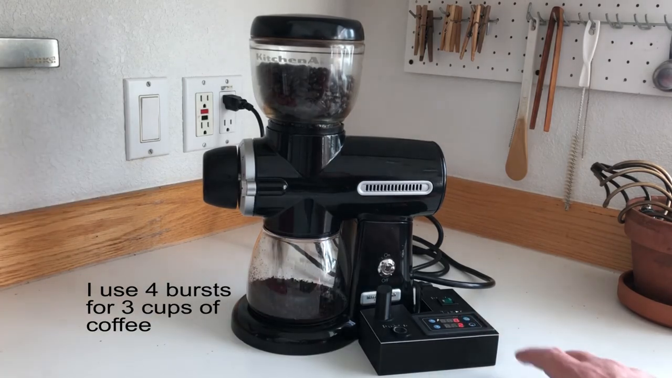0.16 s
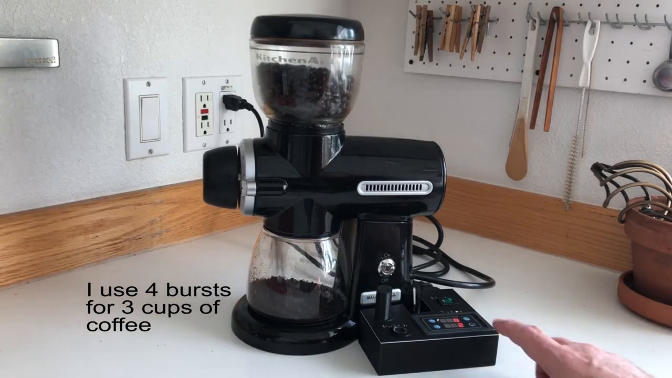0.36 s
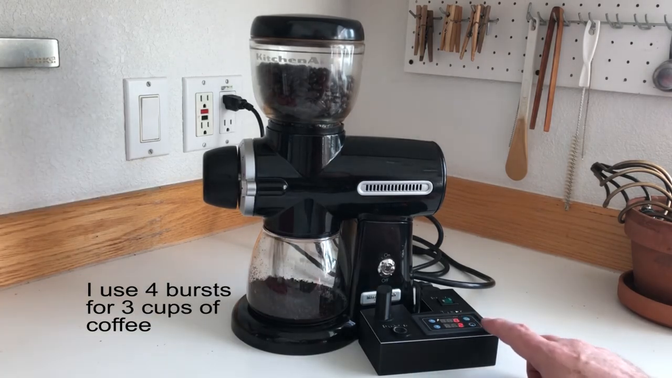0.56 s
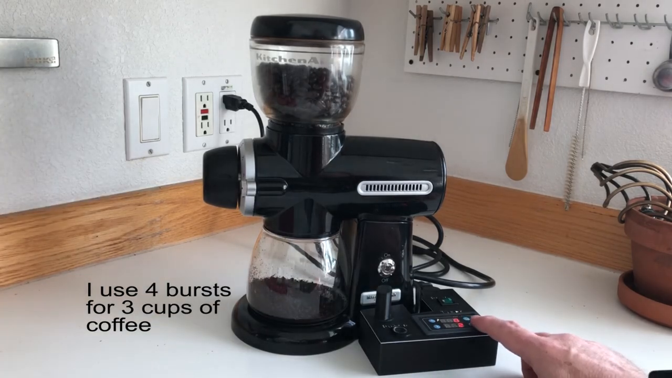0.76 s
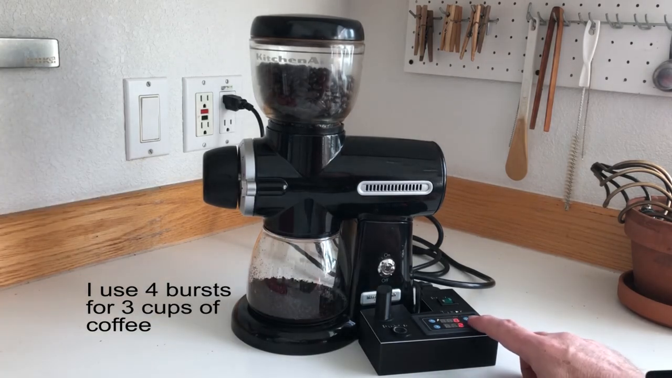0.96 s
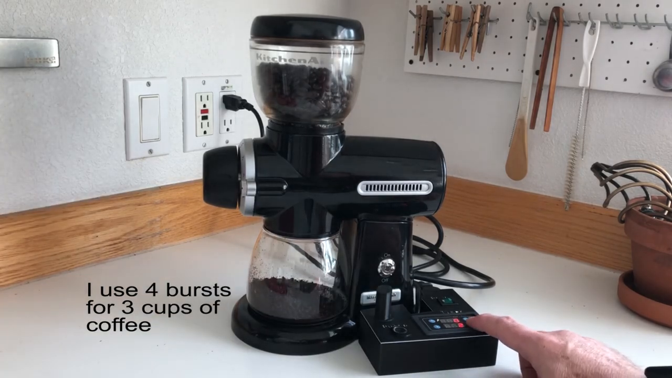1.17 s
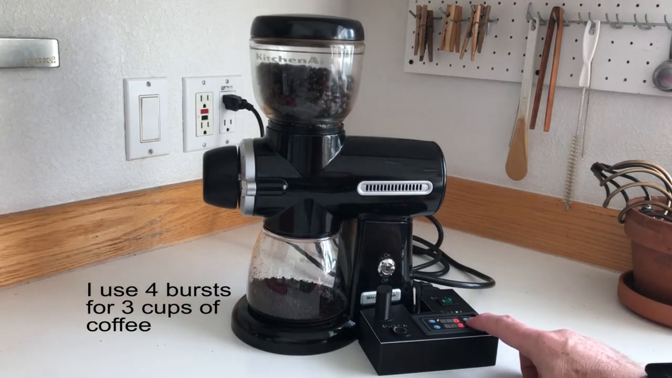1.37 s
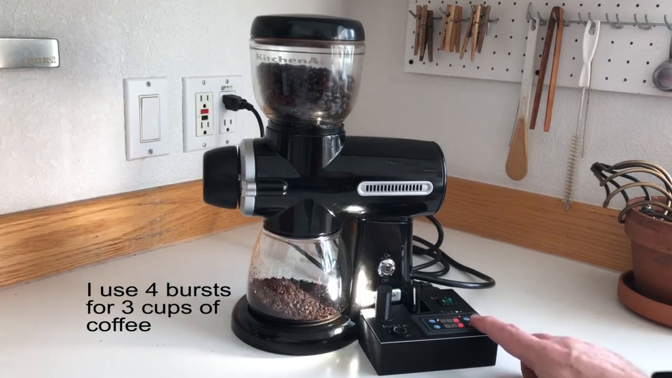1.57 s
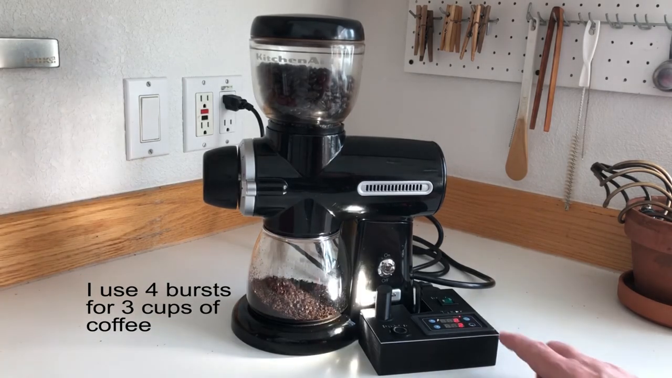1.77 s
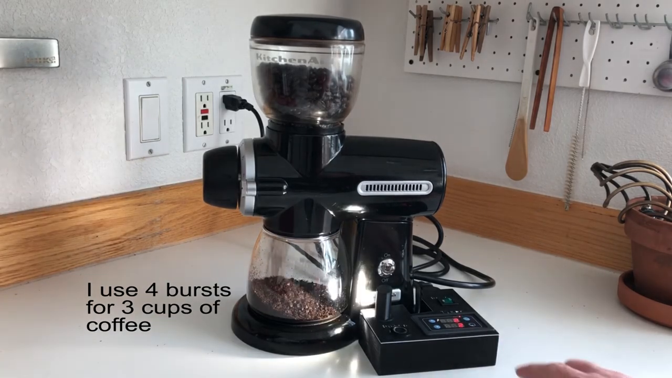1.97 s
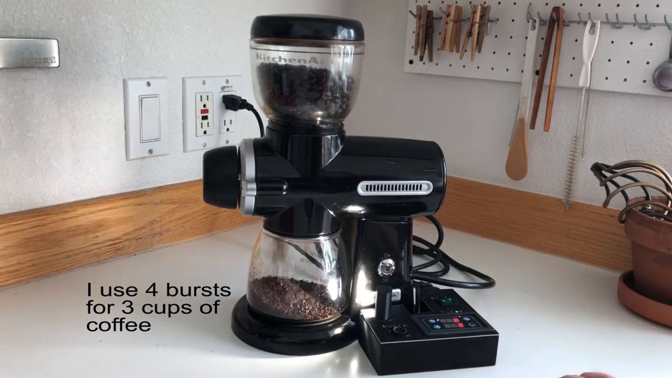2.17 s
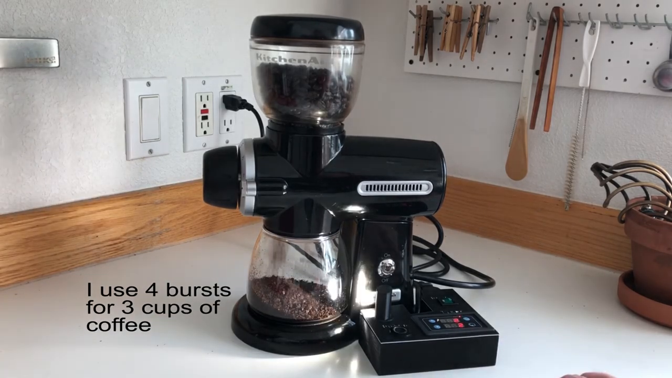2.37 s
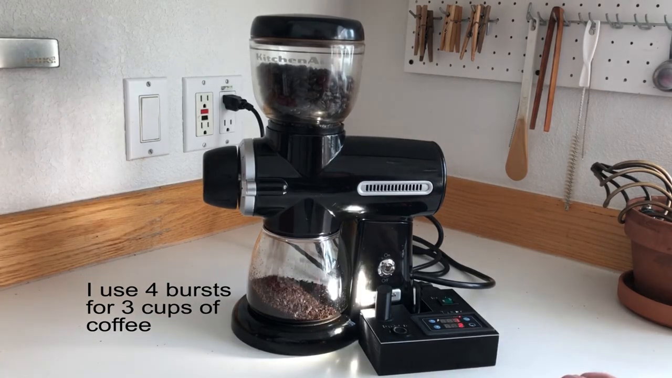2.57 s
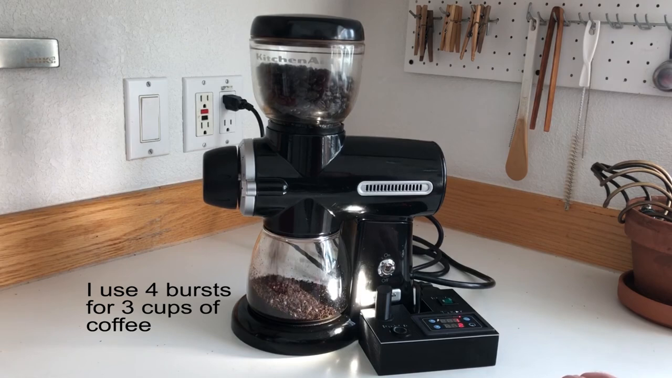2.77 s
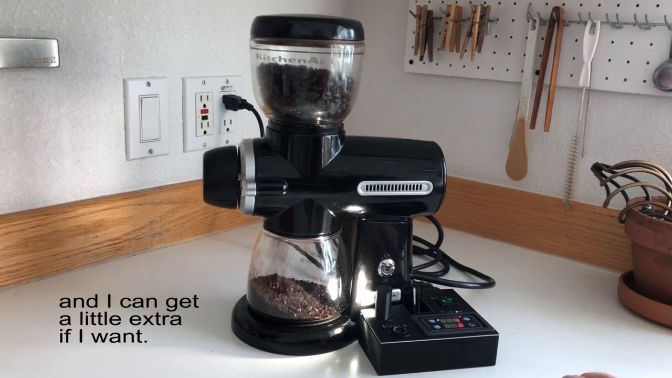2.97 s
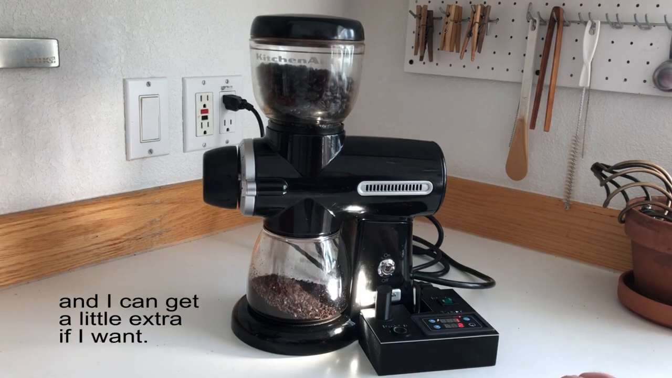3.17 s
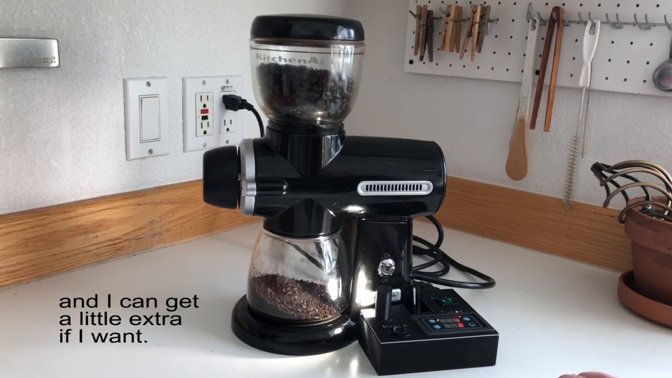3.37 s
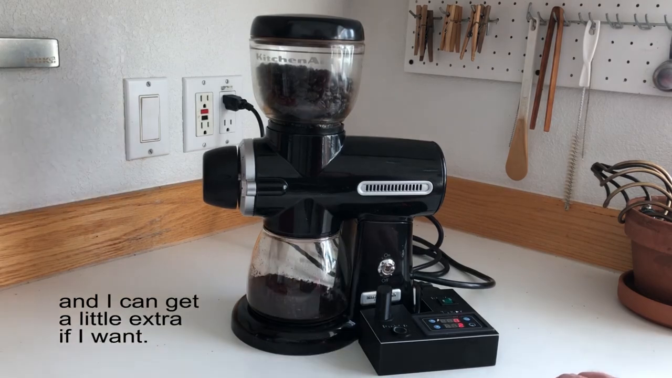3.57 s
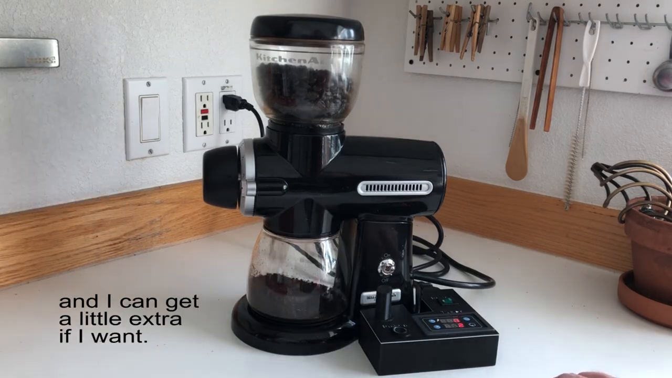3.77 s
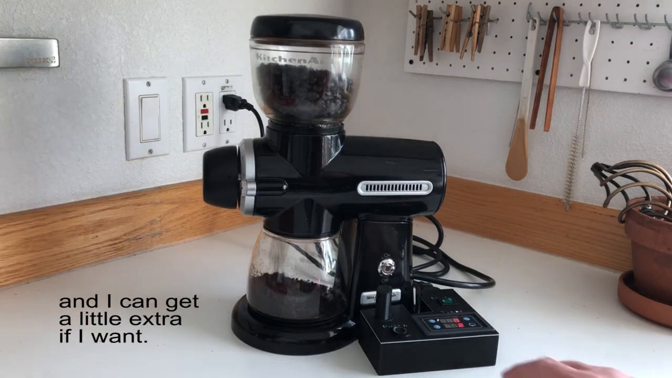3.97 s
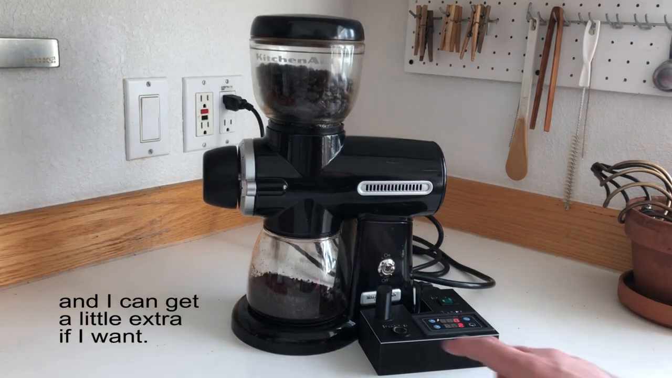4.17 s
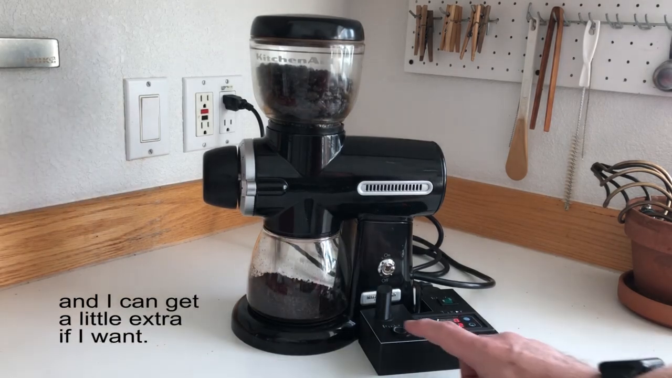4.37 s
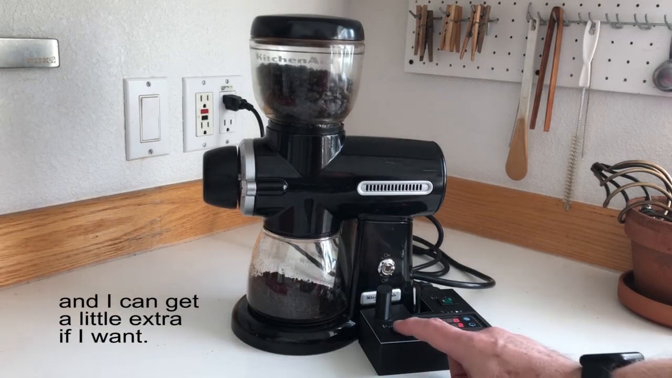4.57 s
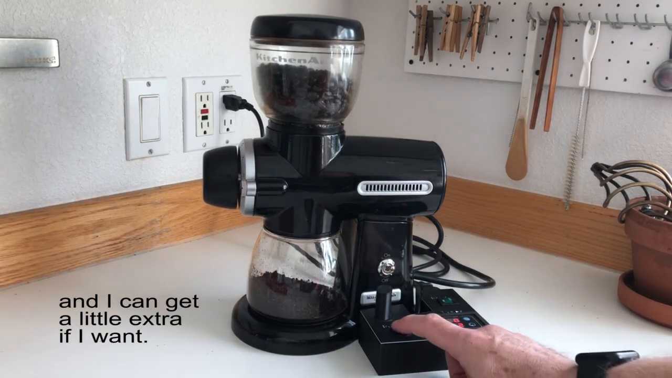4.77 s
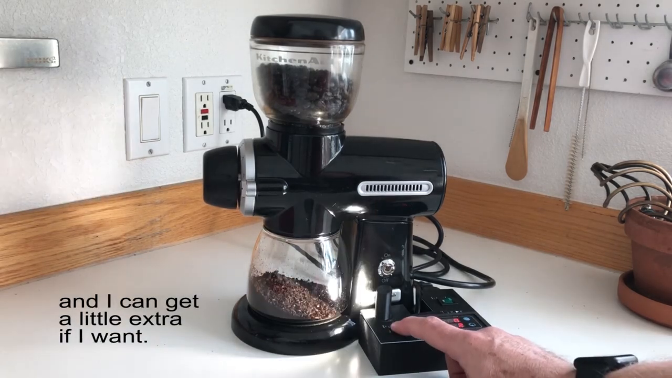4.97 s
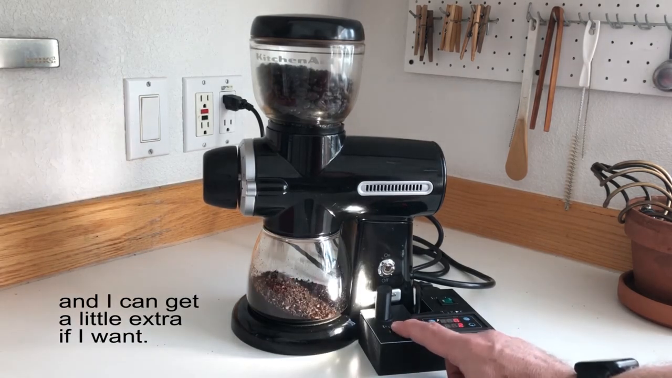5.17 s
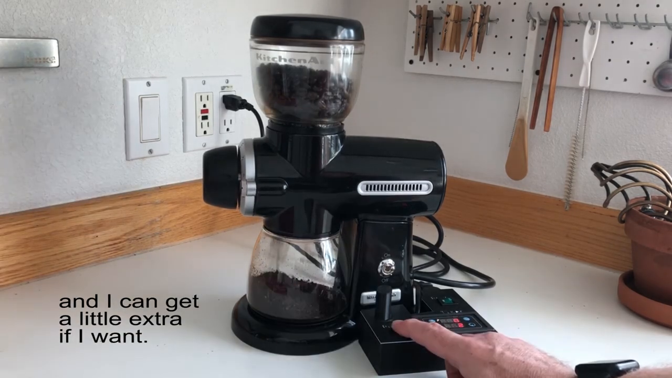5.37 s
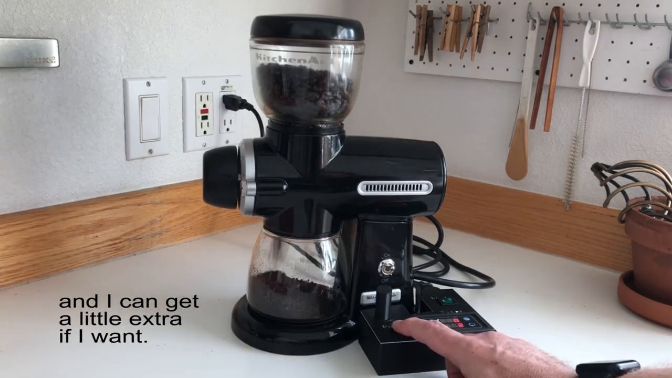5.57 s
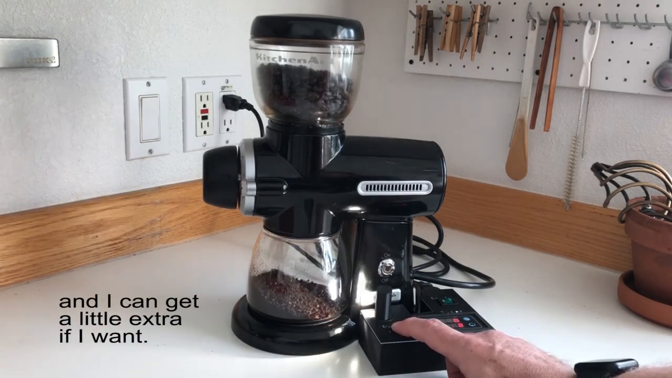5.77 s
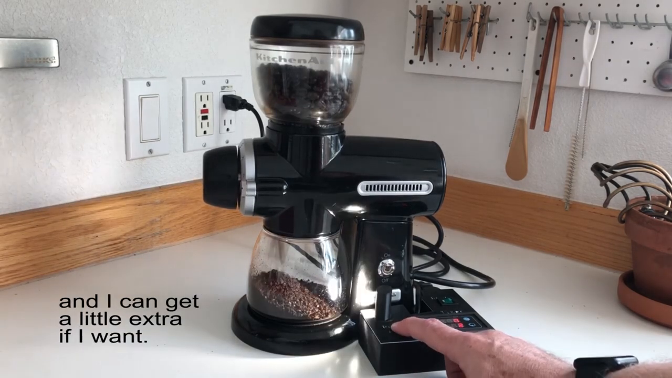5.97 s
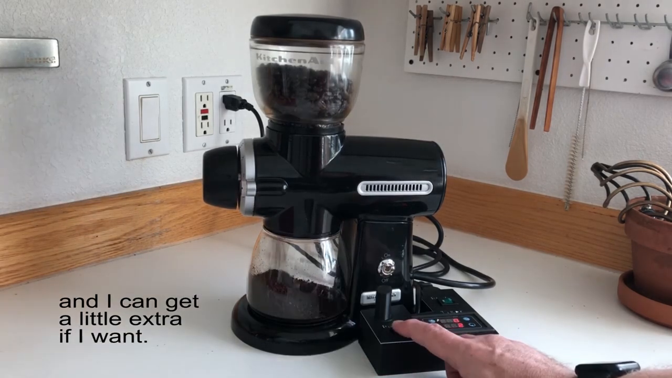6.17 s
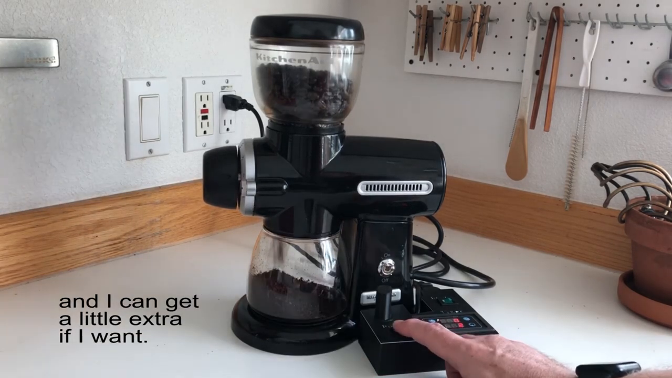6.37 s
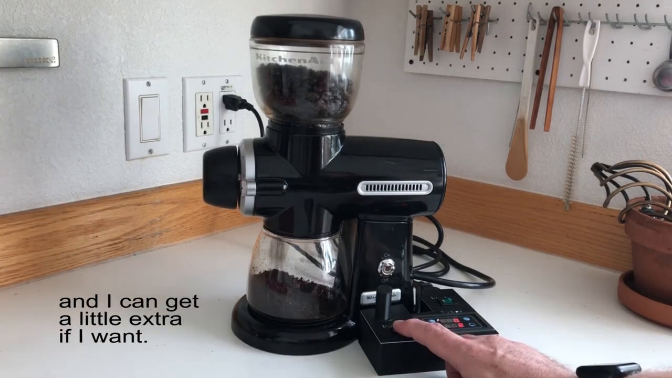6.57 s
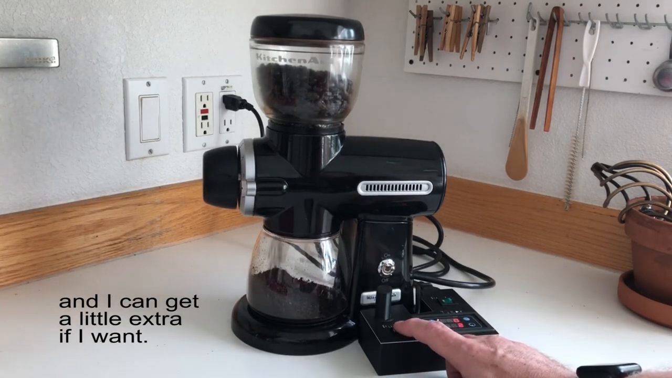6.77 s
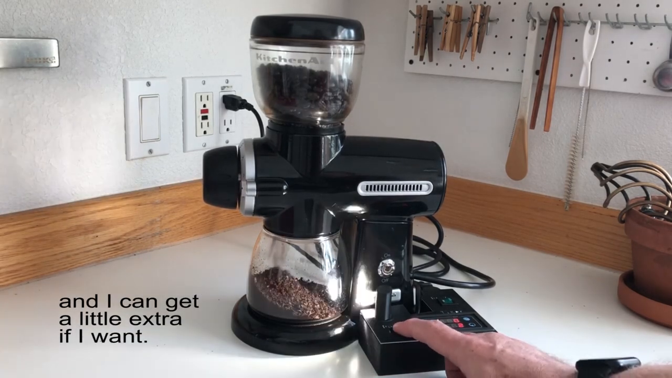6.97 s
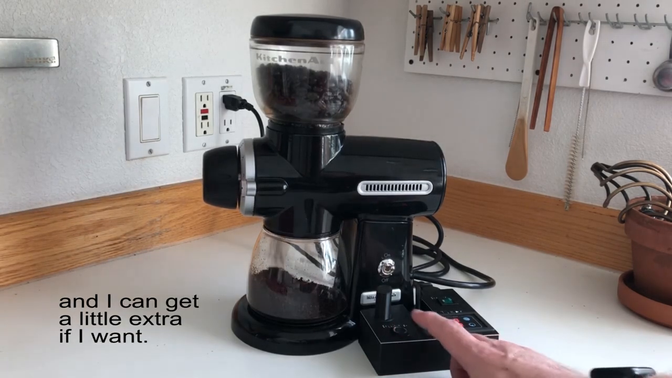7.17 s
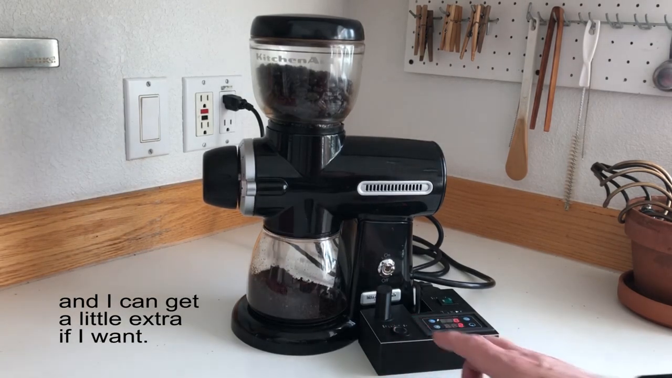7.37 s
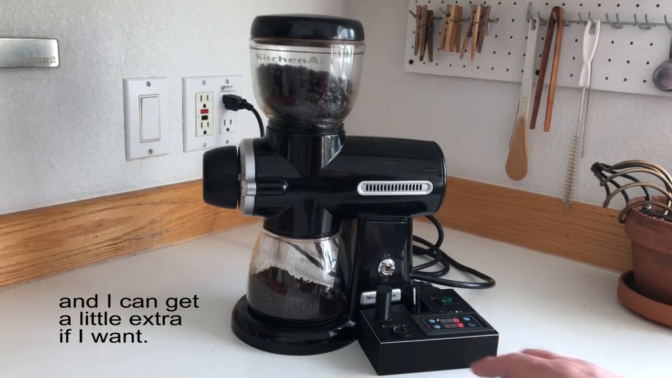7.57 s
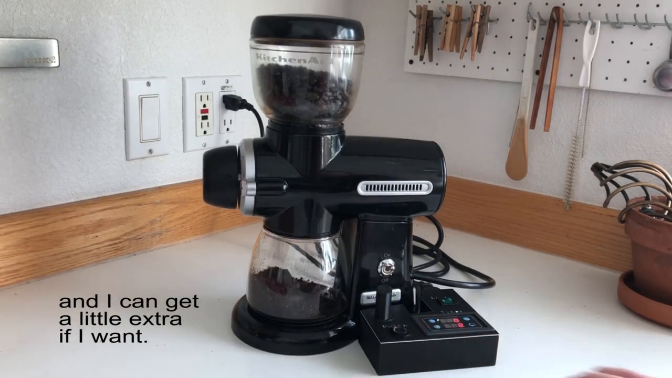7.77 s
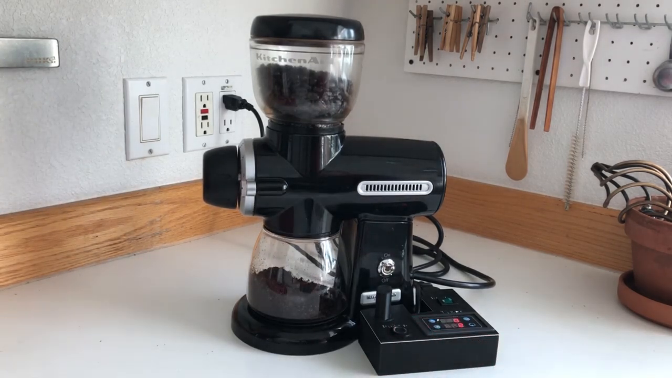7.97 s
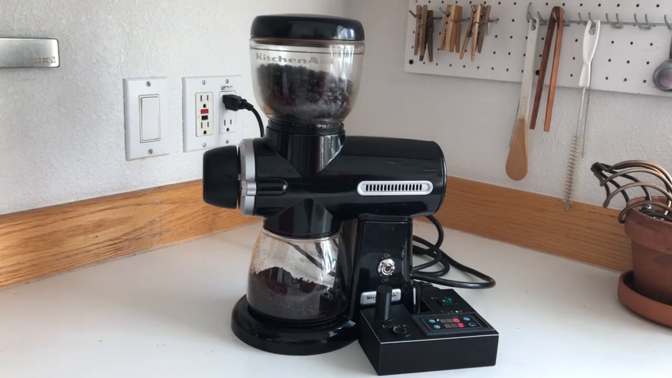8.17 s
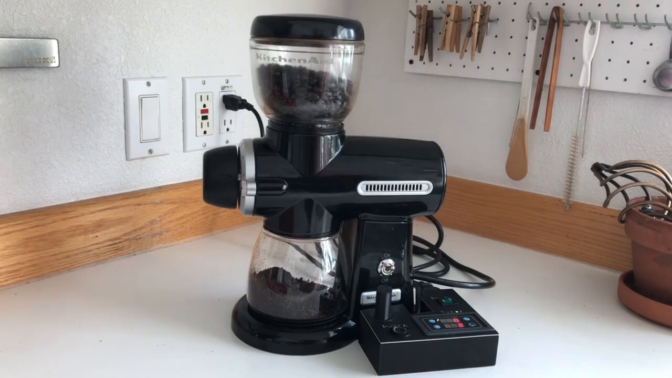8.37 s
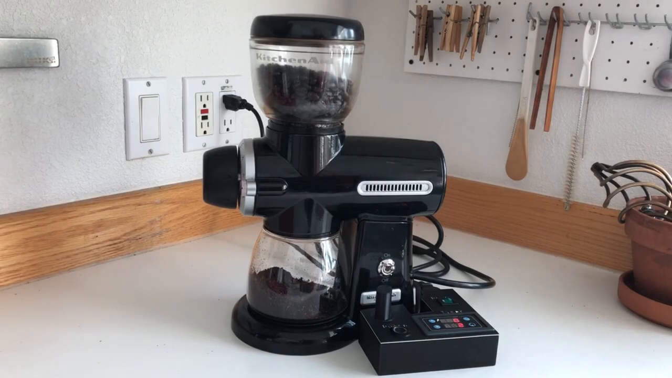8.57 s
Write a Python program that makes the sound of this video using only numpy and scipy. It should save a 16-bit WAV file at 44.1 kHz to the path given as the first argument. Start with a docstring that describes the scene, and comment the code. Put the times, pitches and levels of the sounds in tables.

```python
"""An electric burr coffee grinder on a kitchen counter coasts to a stop and a faint tone fades.
After switch clicks it runs one long burst, then three short ones; each run glides up, holds and coasts down.
Fractured noise rings modelled housing modes for the beans, low noise makes the rumble and a sine pair the hum.
Fragments tick and ping around the stops, grounds slide once after the long burst, and a last click follows.
Filtered noise gives the quiet kitchen beneath it all. The sound is mono."""
import sys
import numpy as np
from scipy import signal
from scipy.fft import rfft, irfft
from scipy.io import wavfile
from scipy.ndimage import uniform_filter1d

SR = 44100
rng = np.random.default_rng(int(sys.argv[2]) if len(sys.argv) > 2 else 0)


def transcribe(signal):
    """Save signal, clipped to [-1, 1], as a 16-bit WAV file at the path in sys.argv[1]."""
    frames = np.atleast_2d(signal).T
    limited = np.clip(frames, -1, 1)
    pcm = np.round(limited * 32767).astype(np.int16)
    wavfile.write(sys.argv[1], SR, pcm)


N = 380141
TIME = np.arange(N) / SR
FILTER_SIZE = 8192
FREQS = np.arange(FILTER_SIZE // 2 + 1) * SR / FILTER_SIZE


def from_db(db):
    """Decibels to gain."""
    return 10 ** (np.asarray(db) / 20)


def rms_one(x):
    """Scale to unit rms."""
    return x / np.sqrt(np.mean(x ** 2) + 1e-20)


def drift(rate):
    """Smooth random curve of rms 1, with rate new random points a second."""
    knots = rng.standard_normal(4000)
    return rms_one(np.interp(TIME * rate, np.arange(len(knots)), knots))


def swell(middle, length):
    """A smooth rise from 0 to 1 and back."""
    return np.cos(np.pi * np.clip((TIME - middle) / length, -.5, .5)) ** 2


def slope(points):
    """Gain over frequency drawn through a few (f/Hz, level/dB) points."""
    hz, db = np.transpose(points)
    return from_db(np.interp(np.log(FREQS + 1), np.log(hz), db))


def resonances(modes):
    """Gain over frequency of (f/Hz, width/Hz, level/dB) modes with steep skirts, their powers added."""
    power = 0
    for hz, width, db in modes:
        peak = from_db(db) / (1 + ((FREQS - hz) / width) ** 2)
        power = power + peak ** 2
    return np.sqrt(power)


def through(x, gain):
    """Causal (minimum-phase) filter of the given shape; white noise keeps its level."""
    cepstrum = irfft(np.log(rms_one(gain) + 1e-5))
    # fold the cepstrum so that all of the response comes after the impulse
    cepstrum[1:FILTER_SIZE // 2] *= 2
    cepstrum[FILTER_SIZE // 2 + 1:] = 0
    impulse_response = irfft(np.exp(rfft(cepstrum)))
    return signal.fftconvolve(x, impulse_response)[:N]


def grains(per_s, spread_db):
    """Random fractures of uneven size; mean power 1 at any rate."""
    sizes = from_db(spread_db * np.minimum(rng.exponential(1, N), 3))
    sizes = sizes * rng.choice([-1, 1], N)
    chance = np.clip(per_s / SR, 1e-4, 1)
    return rms_one(sizes) * (rng.random(N) < chance) / np.sqrt(chance)


def bursts(times, levels_db, t60):
    """Short splintering contacts: noise that starts at once and dies away by 60 dB in t60 seconds."""
    starts = np.zeros(N)
    starts[(times * SR).astype(int)] = from_db(levels_db)
    envelope = signal.lfilter([1], [1, -from_db(-60 / (t60 * SR))], starts + 1e-18)
    return envelope * rng.standard_normal(N)


def burrs(speed, gain_db, patchy_db=0.93, coast_db=0.11, fines_growth=0.25):
    """Beans break in a dense, uneven stream that thins as the burrs slow, ringing and knocking the housing."""
    # resonances of housing, burrs and jar: f/Hz, width/Hz, level/dB
    housing_modes = [(1189, 25, -8), (1385, 22, -3.5), (1654, 50, -1), (1780, 45, -3), (1930, 60, -.5),
                     (2045, 80, 0), (2500, 110, -4.8), (2783, 81, 1.5), (3054, 37, -1.5), (3529, 130, -2),
                     (3950, 50, -6), (4286, 75, -6.5), (5130, 130, -5), (5330, 260, -9), (5560, 71, -10),
                     (6280, 50, -3.5), (7420, 140, -9.5), (7840, 60, -8), (8430, 30, -8), (8930, 140, -14),
                     (9240, 33, -11), (11000, 130, -15), (11800, 92, -14), (13250, 200, -14)]
    # broad colour of shattering beans between the resonances: f/Hz, level/dB
    shatter_colour = [(300, -30), (600, -17.5), (1100, -7.8), (1400, -10), (1900, -12.5), (2600, -9.5),
                      (3300, -12), (4600, -15.5), (5800, -7.5), (6900, -14), (8100, -14.5), (11000, -18),
                      (12400, -18.5), (13300, -18), (16000, -20)]
    # low resonances of the housing: f/Hz, width/Hz, level/dB
    knock_modes = [(285.5, 17, -10.5), (372, 48, -9), (560, 58, -9.5), (715, 28, -2.5), (790, 36, 2.5)]
    # the body shaking on the counter: f/Hz, level/dB
    rumble_colour = [(25, -28.5), (48, -19), (62, -32), (85, -11), (115, -6), (148, 1), (180, 0),
                     (200, -1.5), (225, -6.5), (265, -14), (450, -28), (900, -50.5)]
    # the loudest beans cracking: t/s, level/dB, own pitch f/Hz, knock level re crack/dB
    loud_cracks = [(.061, -24.5, 2300, -0.5), (.262, -26, 1900, -2), (.36, -31, 4100, -8),
                   (0.373, -27, 1060, -5), (0.452, -30.5, 2900, 3), (0.562, -37, 4060, 5.5),
                   (1.564, -29, 1970, 5.5), (1.712, -21.5, 2054, -3.5), (2.389, -19.5, 1260, -3.5),
                   (3.897, -21, 2800, -6), (4.05, -30.5, 1700, 5), (4.241, -35.5, 3200, -3),
                   (4.354, -37, 1290, 7), (6.085, -23, 1350, 0), (6.257, -22, 1500, 2.5),
                   (6.375, -26, 1350, 2), (6.551, -24, 2800, -8), (7.216, -21, 2880, -2.5),
                   (7.415, -23, 1340, -3), (7.441, -24.5, 1400, -6), (7.688, -26.5, 1900, -2)]
    # a hard bean binds and shakes the machine; the row at 5.0 s is instead the jolt as the motor starts: middle
    # t/s, length/s, knock gain/dB, rumble gain/dB
    binds = [(.43, .12, 3, 4), (4.39, .19, 3, 10), (5.0, .05, 2, 7), (5.47, .18, 5, 3), (6.14, .2, 4, 0),
             (6.59, .2, 3, 6), (7.07, .06, 7, 0), (7.45, .2, 4, 4)]

    load = np.clip(speed, .05, 1)
    # beans catch in clumps, the more so at low speed
    uneven = 1 - coast_db * 20 * np.log10(load)
    feed = rms_one(from_db((0.5 * drift(30) + 0.5 * drift(160)) * uneven))
    knock_gain = sum(db * swell(s, length) for s, length, db, _ in binds)
    rumble_gain = sum(db * swell(s, length) for s, length, _, db in binds)

    # each layer follows its own power of the speed
    crunch = from_db(-24.3 + gain_db) * speed ** 1.03 * feed
    crunch = crunch * grains(6000 * load ** .7, spread_db=-1.0)
    knock = from_db(-35.4 + knock_gain) * speed ** .8 * feed
    knock = knock * grains(900 * load ** .5, spread_db=4.0)
    rumble = from_db(-37.8 + rumble_gain) * speed ** .65
    rumble = rumble * grains(1500 * load ** .5, spread_db=3.0)

    pops, jolts, crack_knocks = bean_cracks(loud_cracks + lesser_cracks(speed))
    ringing = through(crunch + jolts, np.hypot(resonances(housing_modes), slope(shatter_colour)))
    # coarse pieces sound low and fine ones high; each size comes and goes by itself
    pieces = np.zeros(N)
    for edge_hz in np.geomspace(1100, 8000, 6):
        coarse = signal.sosfiltfilt(signal.butter(2, edge_hz, fs=SR, output="sos"), ringing)
        pieces += coarse * from_db(patchy_db * uneven * drift(55))
        ringing = ringing - coarse
    # the finest splinters fade further as the burrs slow
    fines = ringing * load ** fines_growth * from_db(0.8 * uneven * drift(22))

    knocking = through(knock + crack_knocks, resonances(knock_modes))
    return pieces + fines + pops + knocking + through(rumble, slope(rumble_colour))


def bean_cracks(cracks, t60=.04, bandwidth=0.092, own_db=-3.0, housing_db=-7, knock_db=-4, swell_s=0.0033):
    """A whole bean gives way over a few milliseconds: a pop at its own pitch, a jolt to the housing and a knock."""
    age = TIME[:SR // 8]
    shape = (1 - np.exp(-age / swell_s)) * from_db(-60 * (age - swell_s) / t60)
    pops, jolts, knocks = np.zeros((3, N))
    noise = rng.standard_normal((3, N))
    for s, db, hz, knock_rel in cracks:
        span = slice(int(s * SR), int(s * SR) + len(age))
        splinters = noise[:, span] * shape * from_db(db)
        b, a = signal.iirpeak(hz, 1 / bandwidth, fs=SR)
        # a narrow pitch would lose power; the division restores it
        pops[span] += from_db(own_db) * signal.lfilter(b, a, splinters[0]) / np.sqrt(b[0])
        jolts[span] += from_db(housing_db) * splinters[1]
        knocks[span] += from_db(knock_db + knock_rel) * splinters[2]
    return pops, jolts, knocks


def lesser_cracks(speed, tries_per_s=9, full_speed_db=-28, spread_db=2.5, low_hz=1200, high_hz=4200):
    """Smaller beans crack at random while the burrs turn, more softly as they slow."""
    cracks, s = [], 0
    for wait, strength, pitch in rng.random((200, 3)):
        s -= np.log(1 - wait) / tries_per_s
        turning = np.interp(s, TIME, speed)
        if turning > 0:
            db = full_speed_db + .9 * 20 * np.log10(turning) + spread_db * (2 * strength - 1)
            cracks.append((s, db, low_hz * (high_hz / low_hz) ** pitch, 0))
    return cracks


def motor(speed, full_hz=193, octave_db=-20, waver_db=1.8, jostle=.016):
    """The hum follows the shaft speed, which the beans jostle, and swells as it glides through the body's resonance."""
    # how strongly the body passes the hum: f/Hz, level/dB
    hum_response = [(95, -70), (119, -53), (136, -36), (150, -34.5), (163, -35.5), (180, -33.5), (188, -38),
                    (194, -44)]
    hz = full_hz * speed
    passed = from_db(np.interp(hz, *np.transpose(hum_response), left=-np.inf))
    level = lagged(passed) * from_db(waver_db * drift(28))
    phase = 2 * np.pi * np.cumsum(hz * (1 + jostle * drift(40))) / SR
    return level * np.sqrt(2) * (np.sin(phase) + from_db(octave_db) * np.sin(2 * phase))


def lagged(drive, lag_s=.014):
    """The body's resonance takes a moment to build up under the hum and to die away."""
    keep = np.exp(-1 / (lag_s * SR))
    return signal.lfilter([1 - keep], [1, -keep], drive + 1e-18)


def shaft(rise_s, drag_s=.72, friction_per_s=.5, halt_s=.14):
    """Share of full speed, and each run's crunch gain: a powered rise, then a coast against drag and friction."""
    # the motor's runs: switched on t/s, held/s, coasting until beans halt the burrs/s, crunch gain/dB
    runs = [(-.8, .6, .87, -.3), (1.551, 2.065, .96, .3), (4.969, .307, .95, -.4), (5.833, .386, .84, -.3),
            (6.917, .166, .8, -1.1)]
    speed, gain_db = np.zeros((2, N))
    brake = friction_per_s * drag_s
    for on, held, coast, db in runs:
        # a restart picks up from whatever speed is left
        lacking = 1 - np.interp(on, TIME, speed)
        driven = 1 - lacking * np.exp(-np.clip(TIME - on, 0, held) / rise_s)
        coasting = (driven + brake) * np.exp(-np.maximum(TIME - on - held, 0) / drag_s) - brake
        free = np.tanh(np.maximum(on + held + coast - TIME, 0) / halt_s)
        speed = np.where(TIME >= on, np.maximum(coasting, 0) * free, speed)
        gain_db = np.where(TIME >= on, db, gain_db)
    return speed, gain_db


def switches(crack_t60=0.0047, snap_t60=.045, thud_t60=0.11):
    """A contact strikes with a brief crack; its spring buzzes on and its plastic box thuds."""
    # switch and relay clicks: t/s, snap level/dB, thud level/dB
    clicks = [(1.359, -36.5, -44), (1.533, -58, -40.5), (1.55, -42.5, -47.5), (4.700, -76, -51),
              (4.949, -74, -58), (7.95, -81, -56)]
    # colours of a click's snap and thud: f/Hz, level/dB
    snap_colour = [(300, -18.5), (900, -17.5), (2300, -2.5), (4500, -8), (7000, 7), (11000, 4.5),
                   (16000, -7.5)]
    thud_colour = [(50, -3.5), (130, 9), (220, 5), (350, -4.5), (700, 2), (1400, -10), (3500, -20),
                   (12000, -39.5)]
    s, snap_db, thud_db = np.transpose(clicks)
    snap = bursts(s, snap_db, t60=crack_t60) + bursts(s, snap_db - 3, t60=snap_t60)
    thud = bursts(s, thud_db, t60=crack_t60) + bursts(s, thud_db - 3.5, t60=thud_t60)
    return through(snap, slope(snap_colour)) + through(thud, slope(thud_colour))


def fragments(slide_at_s=4.645, slide_s=.12, slide_db=-69):
    """Hard crumbs tick and ping against metal and glass; loose grounds slide down the chute once."""
    # last fragments dropping: t/s, tick level/dB, ping level/dB
    drops = [(.534, -44, -56), (.6206, -42.5, -46), (.6395, -44, -58), (0.723, -55, -45.5),
             (.877, -61, -80), (.885, -54, -77), (1.0092, -56, -78), (4.315, -45, -58), (4.341, -41, -58),
             (4.419, -47, -49), (4.46, -63, -50), (4.646, -66, -56), (4.688, -70, -61), (4.724, -59, -68),
             (7.602, -36, -44), (7.8, -42, -52), (7.874, -55, -59), (7.915, -64, -58)]
    # colour of a tick: f/Hz, level/dB
    tick_colour = [(800, -22), (3000, -17), (5500, -8), (8500, 4), (16000, 2.5)]
    # modes pinged by a fragment: f/Hz, width/Hz, level/dB
    ping_modes = [(5980, 120, 7), (6300, 200, -1), (6900, 140, 4)]
    # colour of the sliding grounds: f/Hz, level/dB
    grounds_colour = [(1500, -22), (3000, -12), (3800, 0), (6300, -4), (8000, -12), (16000, -16)]
    s, tick_db, ping_db = np.transpose(drops)
    ticks = through(bursts(s, tick_db, t60=.032), slope(tick_colour))
    pings = through(bursts(s, ping_db, t60=0.045), resonances(ping_modes))
    slide = from_db(slide_db) * swell(slide_at_s, slide_s) * grains(500, spread_db=2.0)
    return ticks + pings + through(slide, slope(grounds_colour))


def after_ring(start_s=.6, length_s=.7, tone_hz=538, tone_db=-71, fade_db_per_s=17):
    """One faint sine of steady pitch fades away around and after the first stop."""
    age = TIME - start_s
    # the moving average softens both ends
    gate = uniform_filter1d(((age > 0) & (age < length_s)) * 1., size=400)
    return gate * from_db(tone_db - fade_db_per_s * age) * np.sin(2 * np.pi * tone_hz * age)


def kitchen(x):
    """Counter and corner walls return a short, dense, dull tail; the rest of the room adds a fainter, longer one."""
    age = TIME[:SR]
    out = x
    # walls, then room: t60/s, level/dB, top f/Hz
    for t60, db, top_hz in ((0.33, -9, 6000), (1.1, -31, 2500)):
        # no reflection comes back before 5.6 ms
        tail = rng.standard_normal(len(age)) * from_db(-60 * age / t60) * (age > 0.0056)
        tail = tail / np.linalg.norm(tail)
        tail = signal.lfilter(*signal.butter(1, top_hz, fs=SR), tail)
        out = out + from_db(db) * signal.fftconvolve(x, tail)[:N]
    return out


def quiet_room(level_db=-67.5):
    """The quiet kitchen: steady noise, strongest in the bass."""
    # colour of the quiet kitchen: f/Hz, level per Hz/dB
    room_colour = [(15, -34.5), (25, -9.5), (86, -2.5), (209, -6), (240, -2), (260, -4.5), (349, -7),
                   (598, -15.5), (1100, -19.5), (2000, -26), (2920, -28.5), (3440, -29), (15500, -36)]
    return from_db(level_db) * through(rng.standard_normal(N), slope(room_colour))


def scene():
    """The grinder in the quiet kitchen, alike in both channels."""
    speed, _ = shaft(rise_s=.054)
    # the starting torque makes the burrs bite sooner than the shaft gains speed
    bite, gain_db = shaft(rise_s=.039)
    reverberant = kitchen(burrs(bite, gain_db) + switches() + fragments())
    mono = reverberant + motor(speed) + after_ring() + quiet_room()
    return np.stack([mono, mono])


def record(dry, low_cut_hz=38, cutoff_hz=15720):
    """The microphone loses the deepest bass; the top is cut steeply."""
    thinned = signal.sosfilt(signal.butter(4, low_cut_hz, "high", fs=SR, output="sos"), dry)
    return signal.sosfilt(signal.ellip(12, .1, 80, cutoff_hz, fs=SR, output="sos"), thinned)


dry = scene()
out = record(dry)
transcribe(out)
```